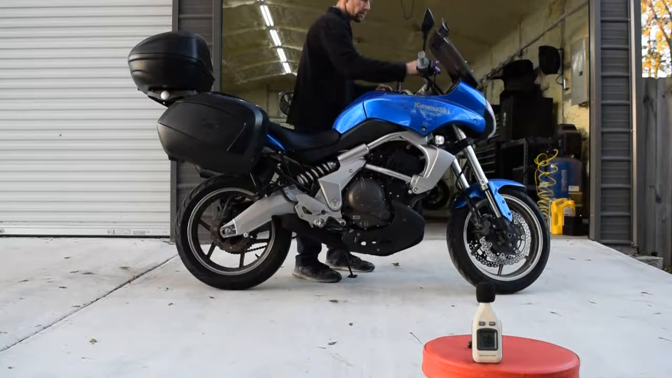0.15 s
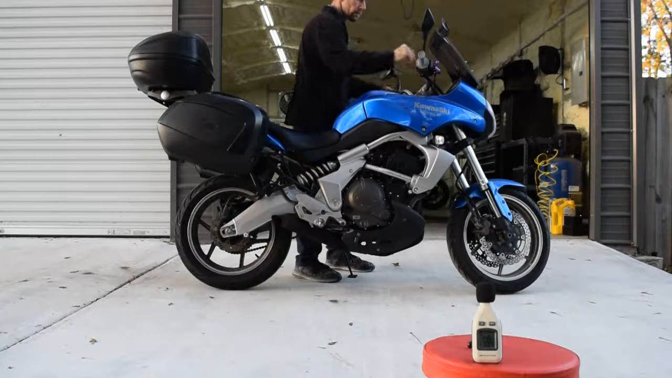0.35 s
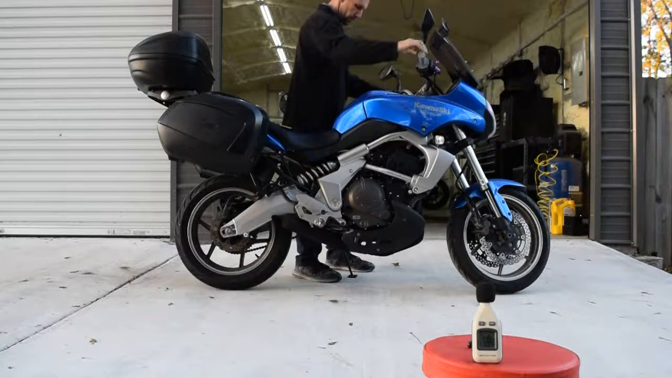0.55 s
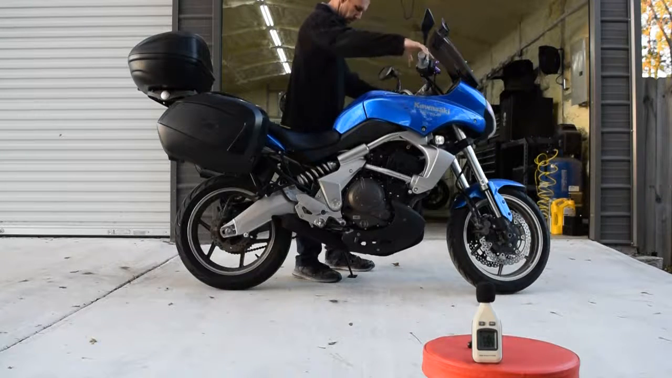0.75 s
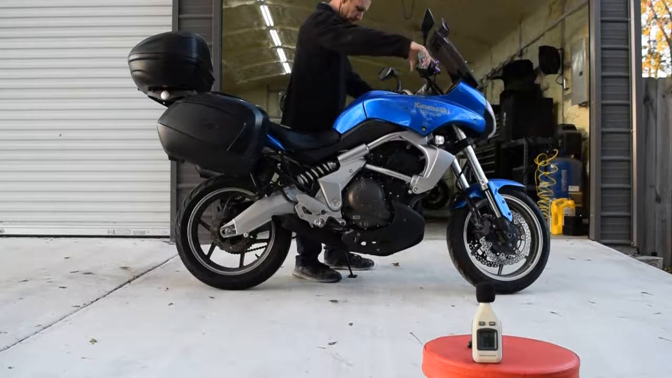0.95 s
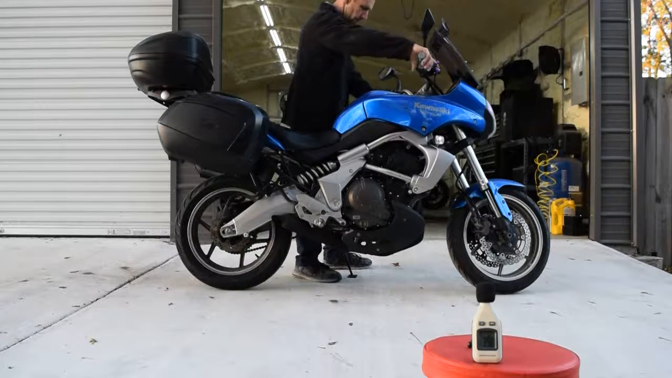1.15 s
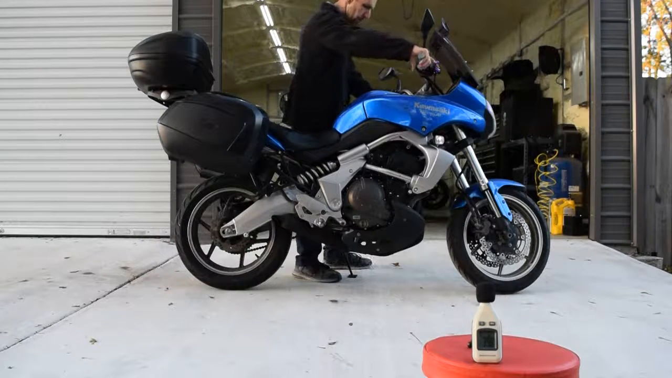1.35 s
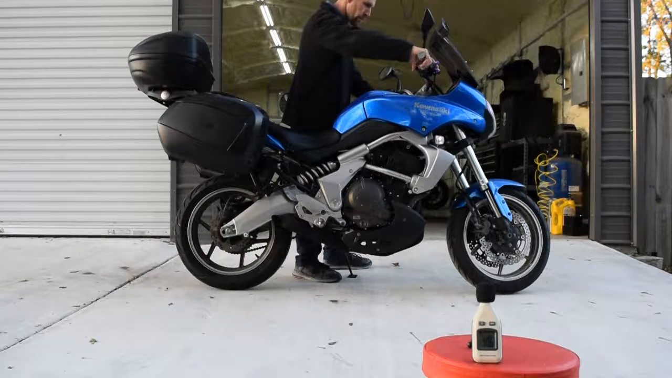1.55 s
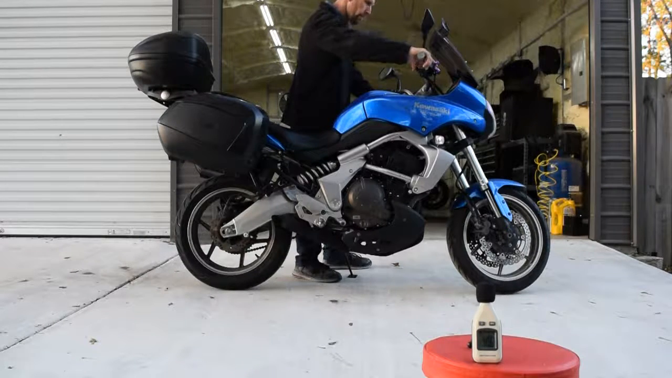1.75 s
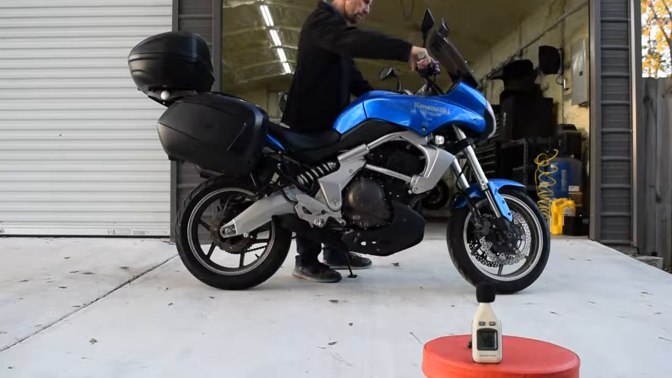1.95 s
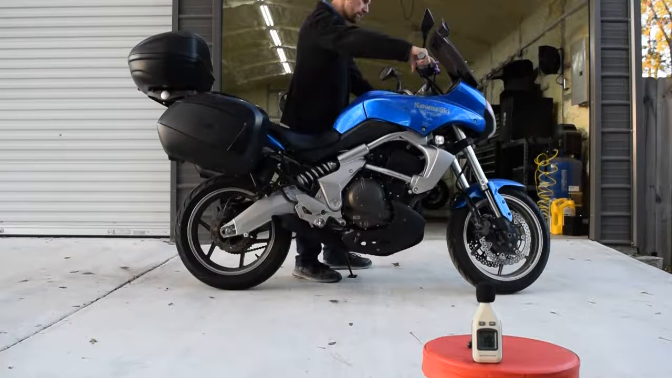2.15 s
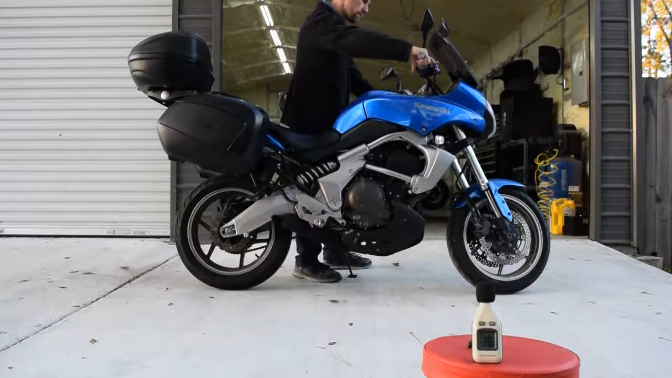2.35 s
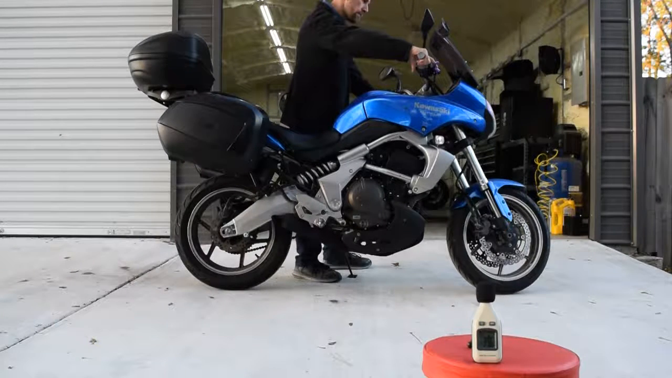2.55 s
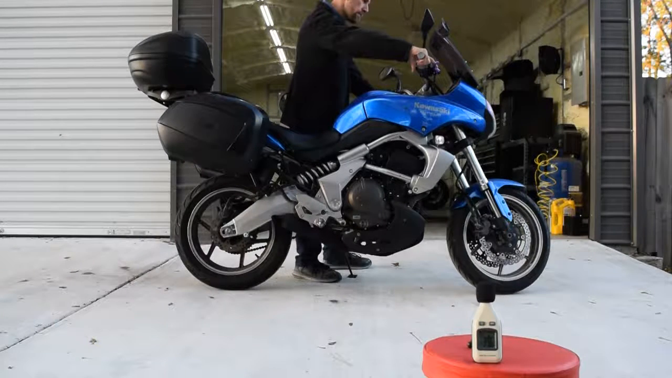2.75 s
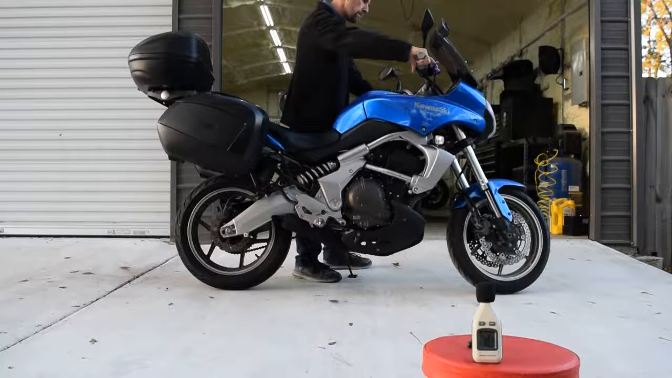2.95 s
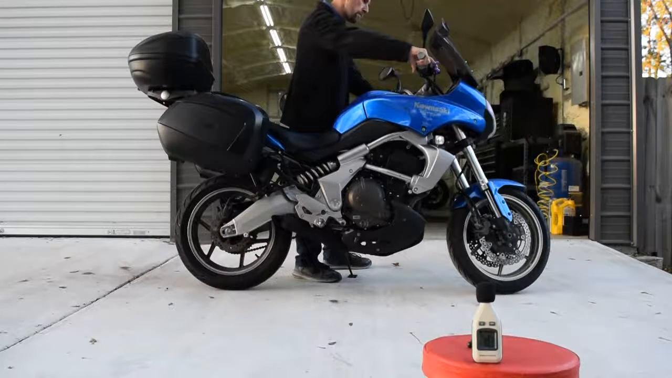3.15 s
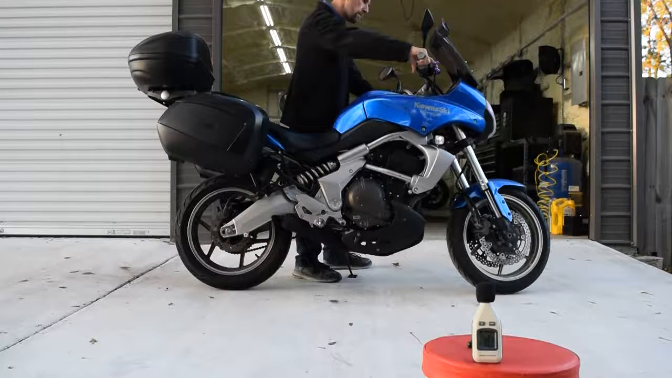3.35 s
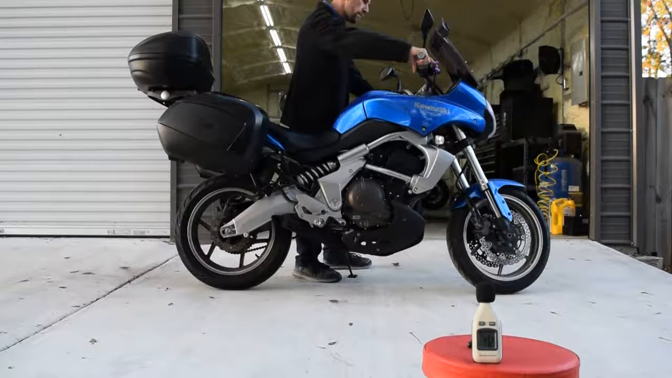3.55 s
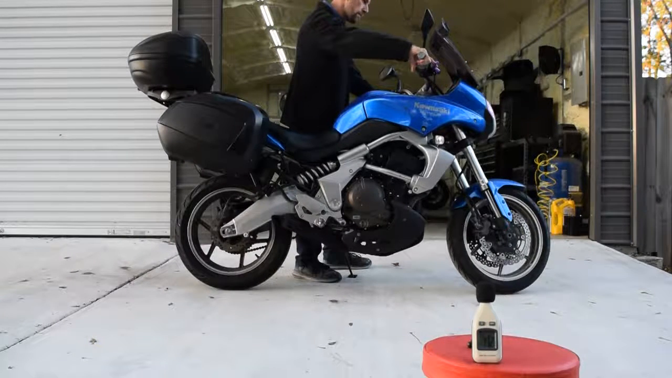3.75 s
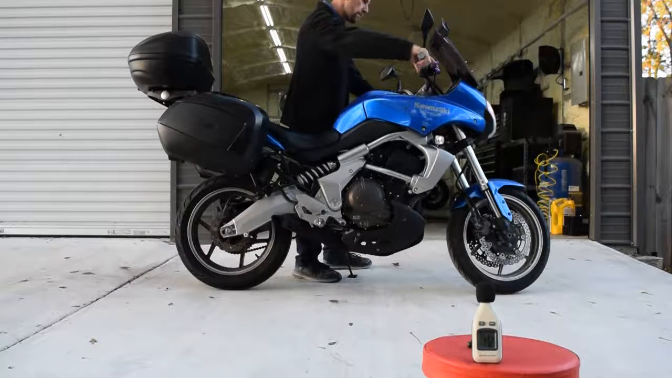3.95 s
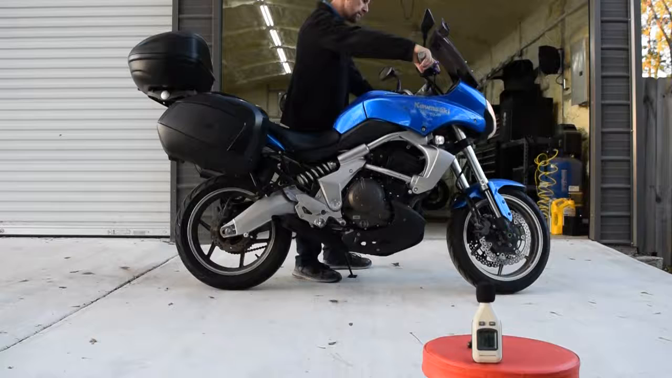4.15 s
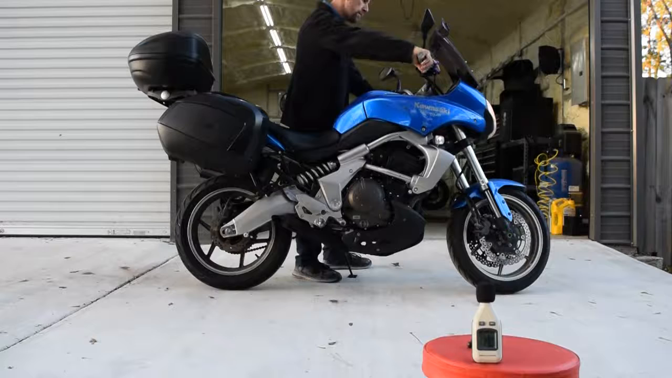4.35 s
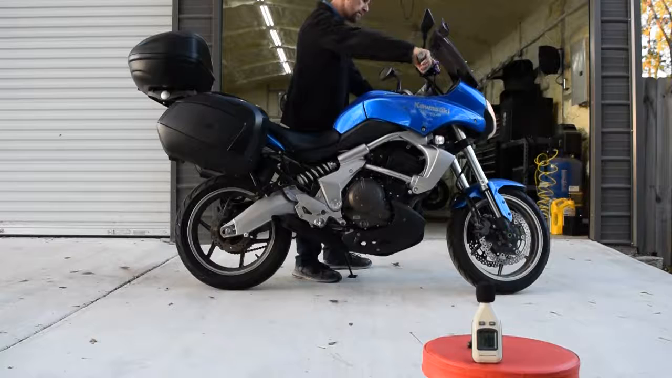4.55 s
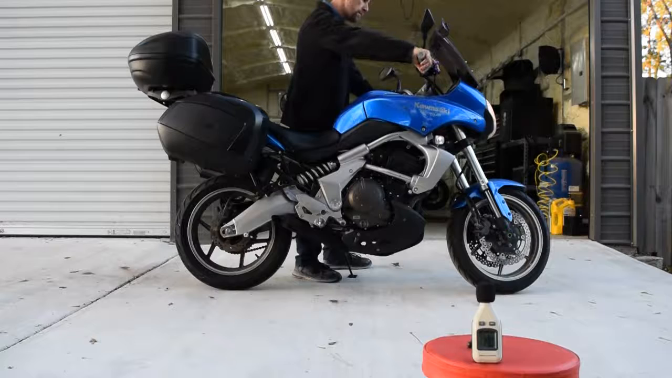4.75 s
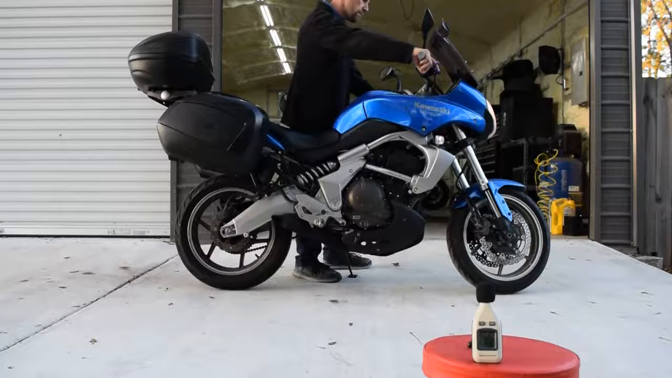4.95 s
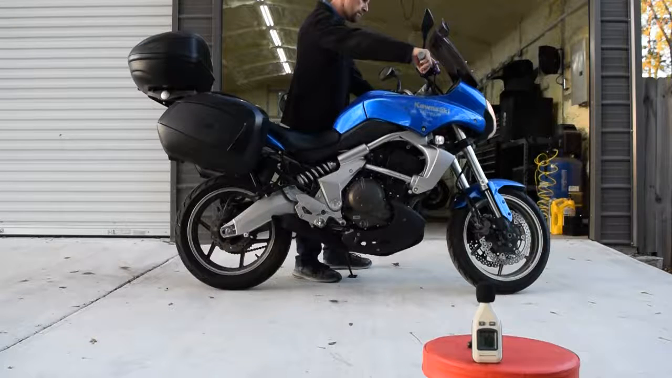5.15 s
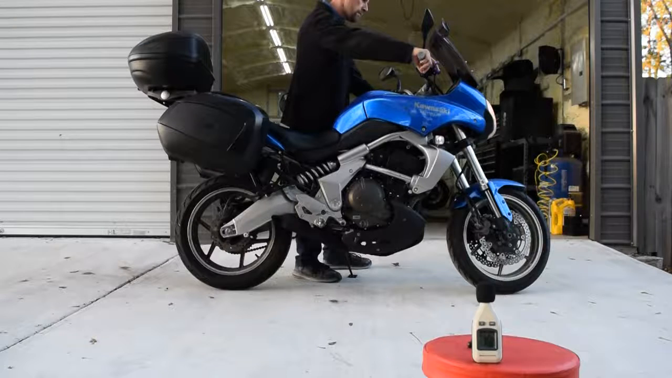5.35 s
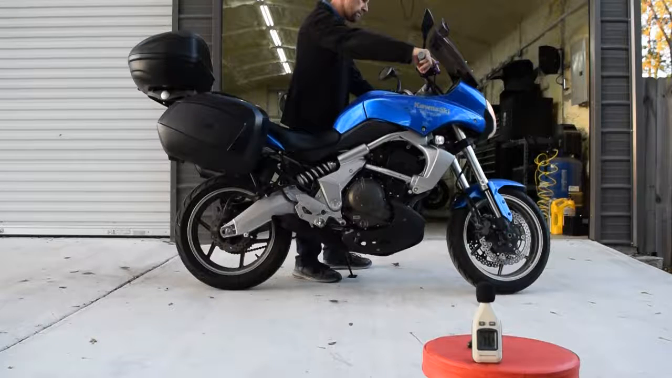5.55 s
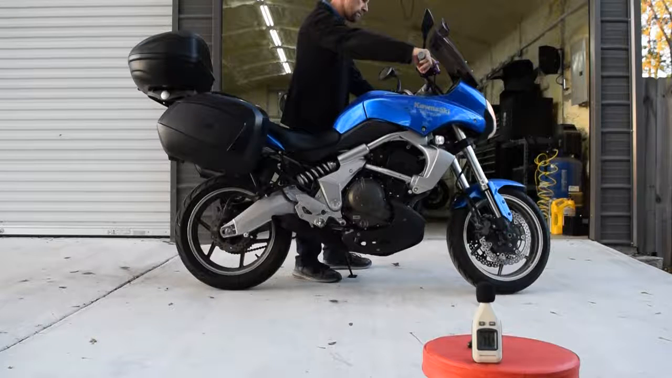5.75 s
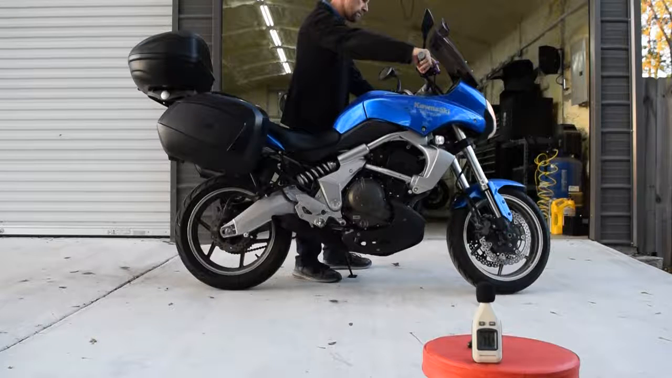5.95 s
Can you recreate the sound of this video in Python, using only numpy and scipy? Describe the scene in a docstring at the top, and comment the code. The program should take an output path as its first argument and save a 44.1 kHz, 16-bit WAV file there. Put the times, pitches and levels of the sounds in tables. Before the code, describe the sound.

Nearly quiet at first: thin steady electric whistle, light key jingle, low town hum and a tiny switch click. Then a sharp metallic clack, a straining starter growl and loud, sudden exhaust beats as a twin motorcycle catches. Its idle is deep, hollow and lumpy, with rasping muffler and mechanical chatter, until the end. Heard outdoors from several metres to the side, with brief reflections from a ribbed door and garage.

```python
"""A two-cylinder motorcycle engine catches, stumbles and idles, with uneven pairs of exhaust beats.
Each beat is a low thump ringing the pipe plus a rasp of noisy gas; gears sing and valve gear rattles with it.
Before that a fuel pump whistles, keys jingle, switches click and a starter clacks, grinds and whines.
Short echoes come from the walls and the open garage; distant traffic and engine drones lie behind."""
import sys
import numpy as np
from scipy import signal
from scipy.fft import rfft, irfft, next_fast_len
from scipy.io import wavfile
from scipy.ndimage import map_coordinates

SR = 44100
rng = np.random.default_rng(int(sys.argv[2]) if len(sys.argv) > 2 else 0)


def generate_wav(signal):
    """Clip the signal to [-1, 1] and save it as 16-bit WAV at the path in sys.argv[1]."""
    frames = np.transpose(np.atleast_2d(signal))
    scaled = np.clip(frames, -1, 1) * 32767
    pcm = np.round(scaled).astype(np.int16)
    wavfile.write(sys.argv[1], SR, pcm)


N = 269010
T = np.arange(N) / SR  # time in seconds

# Exhaust path of each cylinder: pitch_hz, level_db
LEAD_PIPE = [(25, -44), (45, -25), (65, -15), (100, -8), (140, 2.5), (195, -4.5), (260, -2), (340, -8.5),
             (410, -22.5), (600, -2.5), (720, -21), (2000, -32), (6000, -48.5)]
TRAIL_PIPE = [(25, -43), (50, -33), (70, -11.5), (100, -10.5), (145, 0.5), (200, -0.5), (270, 1.5),
              (360, -4), (440, -13), (600, -1.5), (720, -14), (2000, -41.5), (6000, -63)]
# Colour of the gas jet at the outlet: pitch_hz, level_db
JET = [(60, -27), (180, -1.5), (450, -12.5), (800, -5), (1200, -5.5), (2200, 3), (3100, -7.5), (3900, 1.5),
       (5100, -6.5), (7000, -11.5), (8200, -5.5), (9300, -20), (11000, -13), (16000, -38.5)]
# Resonances of the muffler can: pitch_hz, width_hz, relative level_db
CAN_MODES = [(1137, 67, 3), (1607, 235, 2.5), (2346, 82, -4.5), (2845, 31, -10), (3730, 380, -9),
             (4920, 110, -13), (5580, 200, -10), (6160, 130, -31.5), (8030, 620, -12), (10470, 320, -16.5),
             (11760, 330, -14.5)]
# Firings as the engine catches, for each cylinder: start_s, thump_db, rasp_db (relative)
LEAD_CATCH = [(3.5146, -20.1, -21.5), (3.601, -11, -20), (3.6882, -26, -19.5), (3.789, -34.5, -25),
              (3.9174, -19, -23.5)]
TRAIL_CATCH = [(3.5378, -10.5, -17.5), (3.6202, -12, -22.5), (3.713, -33, -23), (3.817, -29.5, -30),
               (3.9438, -13.5, -22.5)]
# Crank speed overshoots, sags and hunts around idle: time_s, speed_rpm
IDLE_RPM = [(3.92, 1131.5), (4.1, 1264.0), (4.34, 1069.3), (4.5, 1140.0), (4.7, 1175.0), (4.92, 1156.8),
            (5.12, 1192.0), (5.25, 1169.1), (5.62, 1208.0), (5.75, 1127.3), (5.92, 1235.7), (6.05, 1166.2)]
# Extra colour for strong firings: pitch_hz, change_db per dB of excess
BARK = [(130, -.9), (340, 0.67), (700, -0.27)]
# Pistons puff unburnt air while cranking: start_s, level_db
PUFFS = [(3.27, -40), (3.343, -40), (3.492, -38)]
# Colour of the valve gear and cases: pitch_hz, level_db
CASES = [(30, -32), (120, 2.5), (400, -7), (800, -9), (1150, 2), (1600, 2), (2000, -4), (3000, -9),
         (4200, -16), (6000, -19.5), (8500, -25.5), (16000, -39)]
# Valves and cam chain knock in every cycle: position (share of cycle), level_db
TAPPETS = [(.36, -30.5), (.57, -34), (.77, -27.5), (0.944, -27)]
# Primary gear note at the crank's fastest and slowest moments: position (share of cycle), pitch_hz
GEAR_SWING = [(.19, 1770), (.82, 1437)]
# Solenoid engages; later the starter clutch snatches and lets go: start_s, level_db
CLACKS = [(3.0805, -17), (3.086, -39), (3.5115, -21.5), (3.529, -21), (3.66, -22.5), (3.68, -22),
          (3.703, -22.5)]
# Colour of the solenoid: pitch_hz, level_db
SOLENOID = [(180, -45), (300, -29), (537, -19), (1010, -6.5), (1560, -1), (2650, -7.5), (2980, -11),
            (3240, -8), (3950, -7.5), (4440, 1), (5340, -13.5), (7690, -11), (8790, -19), (9880, -15),
            (16000, -30)]
# Colour of the starter's grinding: pitch_hz, level_db
GRIND = [(60, -39), (200, -24), (450, -19), (680, -15.5), (1120, 1.5), (1350, 2), (1700, -3), (2600, -9),
         (3400, -12.5), (4100, -18), (6400, -28.5), (9000, -21.5), (10500, -32.5), (12000, -28.5),
         (16000, -42.5)]
# Starter spins the crank up, then strains against two compressions:
# start_s, length_s, first_hz, last_hz, glide_bend (exponent), final growl_db, growl swell_db, grind_db
STRAINS = [(3.11, .062, 1303, 1740, 2.4, -26, 3, -31), (3.233, .043, 2600, 1590, 1, -18.5, 9, -22.5),
           (3.459, .033, 1500, 1226, 0.89, -21.5, -3, -25.5)]
# Partials of the starter gear mesh: multiple (of mesh pitch), level_db
MESH = [(1, 0), (1.5, -13), (2, -6), (3, -14)]
# How well the starter's cover radiates the mesh: pitch_hz, level_db
COVER = [(1000, 0), (2900, 0), (3900, -11), (6000, -13), (9000, -12)]
# Resonances of the starter housing: pitch_hz, width_hz, relative level_db
HOUSING = [(3325, 62, -2), (4150, 90, 0)]
# Armature whine, dragged down under load, racing free, then coasting out: time_s, pitch_hz
ARMATURE = [(3.09, 2700), (3.15, 3420), (3.186, 3290), (3.208, 4080), (3.235, 4300), (3.264, 3400),
            (3.298, 3290), (3.322, 4100), (3.346, 4220), (3.41, 5070), (3.76, 4800), (3.865, 4110),
            (3.994, 3285), (4.1, 2750)]
# Resonances of the motor shell: pitch_hz, width_hz, relative level_db
SHELL = [(3300, 70, 0), (4123, 85, -6), (4800, 120, -19)]
# Overtones of the fuel pump: multiple (of pump pitch), level_db, drift (dB per s as pressure builds)
PUMP_ORDERS = [(1, 1, .5), (3, -20, 0), (4, -20.5, -1), (5, -15, -5)]
# Keys touching on their ring: start_s, relative level_db
KEYS = [(0.7435, -47), (0.7555, -57), (0.7764, -54), (0.8104, -46), (0.8947, -47), (0.9401, -49),
        (1.0663, -52), (1.1586, -49), (1.176, -51)]
# Colour of the keys: pitch_hz, level_db
KEY_RING = [(2000, -23), (5500, -1), (8500, -1), (13000, -5), (16000, -5)]
# Switch and pump relay: start_s, level_db, pitch_hz
SWITCHES = [(2.3, -62, 5300), (2.71, -53, 3720)]
# Ribbed door and garage wall answer: delay_s, level_db
WALLS = [(.0155, -11), (.026, -21)]
# Ringing time in the garage: pitch_hz, time_s (to fall 60 dB)
GARAGE = [(100, 0.5), (1500, 0.82), (5000, 0.23), (14000, 0.21)]
# Colour of distant traffic: pitch_hz, level_db
TOWN = [(25, -50), (45, -27), (65, -14.5), (100, -11), (135, -3.5), (190, -9.5), (300, -9), (550, -7),
        (1000, -1), (1600, -5), (2500, -11.5), (4000, -21.5), (8000, -32.5), (16000, -43)]
# Far engines: start_s, end_s, pitch_hz, level_db
HUM = [(-1, 3.6, 140, -68), (-1, 1.31, 350, -68), (1.24, 3.9, 415, -66.5), (1.43, 4, 468, -64.5)]

IDLE_FROM_S = 4.0204  # the lead cylinder's first idle beat
TRAIL_SHARE = .2425  # share of a cycle by which the second cylinder trails the first
# Relative levels of the idle beats, and how much the beats differ
LEAD_THUMP_DB, LEAD_RASP_DB, TRAIL_THUMP_DB, TRAIL_RASP_DB = -17, -23, -15, -26
THUMP_SCATTER_DB, RASP_SCATTER_DB = .6, .6
# A late burn slows the crank and rasps louder: most extra rasp, and the cycle lengthening that brings it
LATE_BURN_DB, LATE_BURN_S = 1.5, 0.0036
BARK_FROM_DB = -14.5  # firings above this level change colour
# Gear song as its teeth take up load: peak level, depth of the lulls, share of cycle at the first peak
GEAR_DB, GEAR_LULL_DB, GEAR_PEAK_SHARE = -28, 20.5, 0.037
# Case rattle once running, and its flare as the engine catches
RUNNING_DB, FLARE_DB, FLARE_S = -34.5, 4, 0.18
# Free grinding of the starter: start, hold, time to fall 60 dB, level
STARTER_ON_S, STARTER_HOLD_S, STARTER_FADE_S, FREE_GRIND_DB = 3.088, 0.32, 0.5, -34.5
STRAIN_ATTACK_S, STRAIN_RELEASE_S = .005, 0.036
WHINE_DB, COAST_DB = -26, -20  # whine under power and coasting, before the shell's resonances
# The pump spins up to its pitch, then sags as pressure builds
PUMP_STOP_S, PUMP_DB, PUMP_RISE_DB_PER_S = 2.71, -67, 1.36
PUMP_HZ, PUMP_START_HZ, PUMP_SPIN_UP_S, PUMP_SAG_HZ_PER_S = 2830, 2350, .035, 11
TOWN_DB = -50.5
TOP_HZ = 16000  # highest pitch kept


def exhaust():
    """Two cylinders fire a quarter cycle apart: a low thump and a rasping jet each."""
    first = firings(LEAD_CATCH, 0, LEAD_THUMP_DB, LEAD_RASP_DB, LATE_BURN_DB)
    second = firings(TRAIL_CATCH, TRAIL_SHARE, TRAIL_THUMP_DB, TRAIL_RASP_DB, late_db=0)
    low = thumps(first[:, :2], LEAD_PIPE, lead=0.00243, width=.00022)
    low += amp(1.05) * thumps(second[:, :2], TRAIL_PIPE, lead=0.00211, width=0.0003)

    # Keep only the time and rasp level of each firing
    first, second = first[:, ::2], second[:, ::2]
    blowdown = amp(4.5) * bursts(first - [.0045, 0], rise=0.0033, t60=0.031)
    blowdown += amp(6) * bursts(second - [.004, 0], rise=0.0028, t60=.025)
    # The piston then sweeps out the rest of the gas, more softly
    sweep = amp(-8.5) * bursts(first + [.002, 0], rise=0.0048, t60=0.061)
    sweep += amp(-5) * bursts(second + [.002, 0], rise=0.0027, t60=0.063)
    jet = blowdown * grit(spiky_db=4) + sweep * grit(spiky_db=3)

    puff_colour = [(25, -19), (60, -4.5), (130, 1.5), (300, -3), (1000, -40), (4000, -70)]
    puffs = thumps(PUFFS, puff_colour, lead=0.0011, width=0.00071)
    return low + puffs + colour(jet, JET) + amp(9) * resonate(jet, CAN_MODES)


def firings(catch, share, thump_db, rasp_db, late_db):
    """One cylinder's times, thump and rasp levels: stumbling start, then idle; longer cycles can rasp more."""
    s = idle_times(share)
    # How much longer each cycle is than the one before
    lengthening = np.append(np.diff(np.append(catch[-1][0], s), 2), 0)
    scatter = rng.standard_normal((len(s), 2)) * [THUMP_SCATTER_DB, RASP_SCATTER_DB]
    levels = [thump_db, rasp_db] + scatter
    levels[:, 1] += late_db * np.tanh(lengthening / LATE_BURN_S)
    return np.vstack([catch, np.column_stack([s, levels])])


def idle_times(share):
    """Add up the crank speed to find when the idling engine passes this share of each two-turn cycle."""
    rpm, = curves(IDLE_RPM)
    cycle = np.cumsum(rpm / 120) / SR  # two turns per cycle
    cycle -= np.interp(IDLE_FROM_S, T, cycle)
    return np.interp(np.arange(share, cycle[-1], 1), cycle, T)


def thumps(rows, pipe, lead, width):
    """Each slug of gas swells, peaks and rings the pipe; levels are rms over 9 ms."""
    t, out = T[:SR // 50], np.zeros(N)
    for s, db in rows:
        slug = np.exp(-abs(t - t.mean()) / (width * amp(rng.normal(0, 1))))
        excess_db = max(db - BARK_FROM_DB, 0)
        barking_pipe = [(hz, level + excess_db * along(BARK, hz)) for hz, level in pipe]
        wave = np.convolve(slug, impulse(barking_pipe))
        wave = wave / np.linalg.norm(wave) * np.sqrt(.009 * SR)
        add(out, s - lead - t.mean(), amp(db) * wave)
    return out


def machinery():
    """Valve gear rattles while the primary gear sings with the uneven crank speed."""
    starts = np.append(np.array(LEAD_CATCH)[:, 0], idle_times(0))
    starts = np.append(starts, 2 * starts[-1] - starts[-2])
    cycle = np.interp(T, starts, np.arange(len(starts)))

    hz = np.interp(cycle, *np.transpose(GEAR_SWING), period=1)
    hz = hz * (1 + .012 * wobble(20) + .011 * wobble(500))
    lull = np.sin(3 * np.pi * (cycle - GEAR_PEAK_SHARE)) ** 2  # three lulls a cycle
    gear_level = amp(GEAR_DB - GEAR_LULL_DB * lull + 1.9 * wobble(30))
    gear = gear_level * (tone(hz) + amp(-13.0) * tone(2 * hz))
    gear *= np.clip((T - starts[0]) / 0.38, 0, 1)  # the note firms up after the engine catches

    knocks = [(s + share * length, db) for s, length in zip(starts, np.diff(starts))
              for share, db in TAPPETS]
    flare = np.exp(-((T - starts[2]) / FLARE_S) ** 2)
    rattle = amp(RUNNING_DB + FLARE_DB * flare + 2.4 * wobble(200)) * grit(spiky_db=3)
    rattle *= np.clip((T - STRAINS[-1][0]) / 0.047, 0, 1)
    rattle += bursts(knocks, rise=0.0014, t60=0.049) * grit(spiky_db=3)
    return gear + colour(rattle, CASES)


def starter():
    """The solenoid clacks, then the gears grind and growl against compression."""
    clack = colour(bursts(CLACKS, rise=0.00076, t60=0.041) * grit(spiky_db=-2.5), SOLENOID)
    load = amp(FREE_GRIND_DB) * gate(STARTER_ON_S, STARTER_HOLD_S, attack=0.017, release=STARTER_FADE_S)
    mesh_hz, strain = np.zeros(N), np.zeros(N)
    for s, length, first_hz, last_hz, bend, growl_db, swell_db, grind_db in STRAINS:
        effort = gate(s, length, STRAIN_ATTACK_S, STRAIN_RELEASE_S)
        to_go = np.clip(1 - (T - s) / length, 0, 1)  # falls from 1 to 0 over the strain
        glide_hz = last_hz + (first_hz - last_hz) * to_go ** bend
        mesh_hz = np.where(T >= s, glide_hz, mesh_hz)
        strain += amp(growl_db - swell_db * to_go) * effort
        load += amp(grind_db) * effort
    grind = colour(load * amp(1.7 * wobble(300)) * grit(spiky_db=3.5), GRIND)

    mesh_hz *= 1 + .016 * wobble(700) + .008 * wobble(120)
    growl = np.zeros(N)
    for k, level in MESH:
        partial_db = level + along(COVER, k * mesh_hz) + 2.4 * wobble(250)
        growl += strain * amp(partial_db) * tone(k * mesh_hz)
    return clack + grind + amp(0.5) * resonate(grind, HOUSING) + growl + whine()


def whine():
    """The armature's note swells wherever its speed meets a resonance of the shell."""
    hz, = curves(ARMATURE)
    hz = hz * (1 + .004 * wobble(400))
    responses = [amp(db) / np.hypot(1, 2 * (hz - centre) / width) for centre, width, db in SHELL]
    ring = np.max(responses, axis=0)
    level_db = np.where(T < LEAD_CATCH[0][0], WHINE_DB, COAST_DB) + 1.5 * wobble(150)
    spinning = gate(STARTER_ON_S, ARMATURE[-1][0] - STARTER_ON_S, attack=0.11, release=.05)
    return spinning * amp(level_db) * ring ** 1.3 * (tone(hz) + amp(-26) * tone(2 * hz))


def ignition():
    """The fuel pump whistles as it primes; keys tick and rustle on their ring; switches click."""
    hz = PUMP_HZ - (PUMP_HZ - PUMP_START_HZ) * np.exp(-T / PUMP_SPIN_UP_S) - PUMP_SAG_HZ_PER_S * T
    hz = hz * (1 + 0.00073 * wobble(30))
    running = gate(0, PUMP_STOP_S, attack=.07, release=.03)
    running *= amp(PUMP_DB + PUMP_RISE_DB_PER_S * T + 1.3 * wobble(15))
    pump = running * sum(amp(level + drift * T) * tone(k * hz) for k, level, drift in PUMP_ORDERS)

    ticks = amp(-11.0) * bursts(KEYS, rise=.0004, t60=0.039)
    rustle = amp(-23.5 + 3 * wobble(150)) * bursts(KEYS, rise=.008, t60=.25)
    out = pump + colour((ticks + rustle) * grit(spiky_db=5), KEY_RING)
    for s, db, hz in SWITCHES:
        click = bursts([(s, db)], rise=.001, t60=0.054) * grit(spiky_db=0)
        out += colour(click, [(hz / 2, -14), (hz, 0), (2 * hz, -14), (4 * hz, -32)])
    return out


def garage(x, tail_db):
    """Ribbed surfaces scatter short echoes; the open garage rings briefly."""
    out = np.zeros(N)
    bright = colour(x, [(100, -7.5), (600, -4.5), (1500, -1.5), (16000, 1.5)])
    for delay, db in WALLS:
        ribs = rng.standard_normal(SR // 400)
        add(out, delay, amp(db) * signal.fftconvolve(bright, ribs / np.linalg.norm(ribs)))
    # Noise that dies away at a different rate for each pitch
    hz, t, z = signal.stft(rng.standard_normal(SR // 2), SR, nperseg=256)
    decay = amp(-60 * t / along(GARAGE, hz)[:, None])
    tail = signal.istft(z * decay, SR, nperseg=256)[1]
    add(out, .008, amp(tail_db) * signal.fftconvolve(bright, tail / np.linalg.norm(tail)))
    return out


def town():
    """Distant traffic is coloured noise, with wavering engine drones that come and go."""
    out = amp(TOWN_DB + .3 * wobble(3)) * colour(rng.standard_normal(N), TOWN)
    for start, end, hz, level in HUM:
        fade = np.clip(np.minimum(T - start, end - T) / 0.35, 0, 1)
        out += fade * amp(level + 3.0 * wobble(6.0)) * tone(hz + 3 * wobble(24.9))
    return out


def amp(db):
    """Decibels to gain."""
    return 10 ** (np.asarray(db) / 20)


def unit(x):
    """Scale to rms 1."""
    return x / np.sqrt(np.mean(x ** 2) + 1e-20)


def along(points, hz):
    """Read a value at a pitch from (pitch, value) points on a log axis."""
    f, v = np.transpose(points)
    return np.interp(np.log(hz + 1), np.log(f + 1), v)


def curves(rows, at=T):
    """Each column after the first, joined by straight lines."""
    s, *cols = np.transpose(rows)
    return [np.interp(at, s, c) for c in cols]


def wobble(rate):
    """A smooth random curve, rate knots a second."""
    knots = rng.standard_normal(int(N * rate / SR) + 4)
    steps = np.arange(0, len(knots) - 1, 1 / 6)
    return np.interp(T * rate, steps, map_coordinates(knots, [steps]))


def grit(spiky_db):
    """White noise of rms 1 whose strength flickers from one instant to the next."""
    return unit(rng.standard_normal(N) * amp(spiky_db * wobble(2500)))


def tone(hz):
    """A sine of rms 1 that follows a pitch curve."""
    return np.sqrt(2) * np.sin(2 * np.pi * np.cumsum(hz) / SR)


def gate(start, length, attack, release):
    """Envelope that rises, holds, then falls 60 dB in the release time."""
    rise = np.clip((T - start) / attack, 0, 1)
    return rise * amp(-60 * np.maximum(T - start - length, 0) / release)


def bursts(rows, rise, t60):
    """Envelope of blows, given by time and peak level, that swell and die away."""
    t, env = T[:SR // 4], np.zeros(N)
    shape = (1 - np.exp(-(t / rise) ** 2)) * amp(-60 * t / t60)
    for s, db in rows:
        add(env, s, amp(db) * shape / shape.max())
    return env


def add(track, s, x):
    """Mix x into the track at time s."""
    part = track[max(round(s * SR), 0):][:len(x)]
    part += x[:len(part)]


def impulse(points, size=4096):
    """Causal impulse response of energy 1 with the given spectrum."""
    # Folding the cepstrum puts the energy as early as possible
    cepstrum = irfft(np.log(amp(along(points, np.fft.rfftfreq(size, 1 / SR)))))
    cepstrum[1:size // 2] *= 2
    cepstrum[size // 2 + 1:] = 0
    h = irfft(np.exp(rfft(cepstrum)))
    return h / np.linalg.norm(h)


def colour(x, points):
    """Pass x through a body with the given spectrum."""
    return signal.fftconvolve(x, impulse(points))[:N]


def filtered(x, response):
    """Weight each pitch in x by a response of frequency."""
    m = next_fast_len(N + SR // 2)
    return irfft(rfft(x, m) * response(np.fft.rfftfreq(m, 1 / SR)), m)[:N]


def resonate(x, modes):
    """Pass x through resonances side by side, with alternating signs."""
    def response(f):
        return sum((-1) ** k * amp(db) * 1j * f * w / (c * c - f * f + 1j * f * w)
                   for k, (c, w, db) in enumerate(modes))
    return filtered(x, response)


def scene():
    """The motorcycle, its echoes and the town behind."""
    bike = exhaust() + machinery() + starter() + ignition()
    return (bike + garage(bike, tail_db=-15.5) + town())[None]


def record(dry):
    """Peaks clip at full scale, then pitches above the band limit are removed."""
    clipped = np.clip(dry[0], -1, 1)
    return filtered(clipped, lambda hz: np.clip((TOP_HZ - hz) / 400 + .5, 0, 1))[None]


dry = scene()
out = record(dry)
generate_wav(out)
```